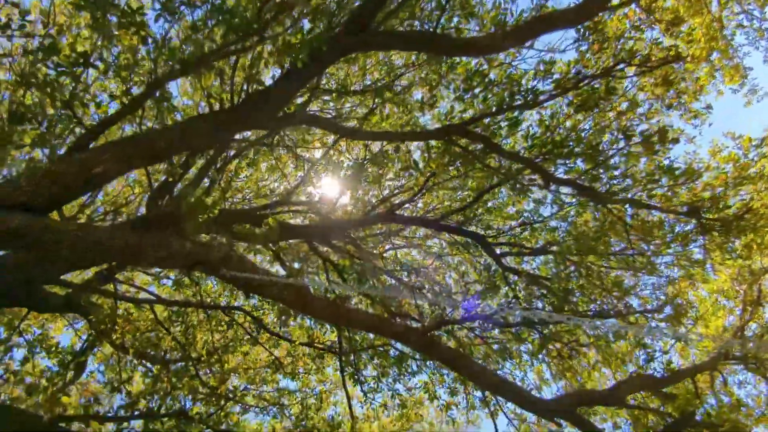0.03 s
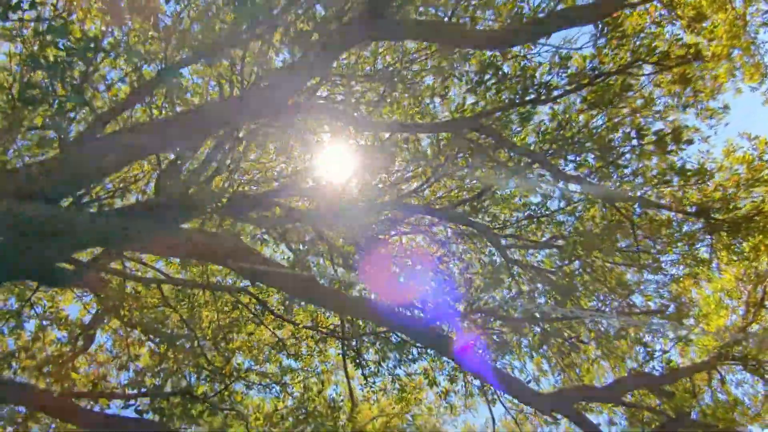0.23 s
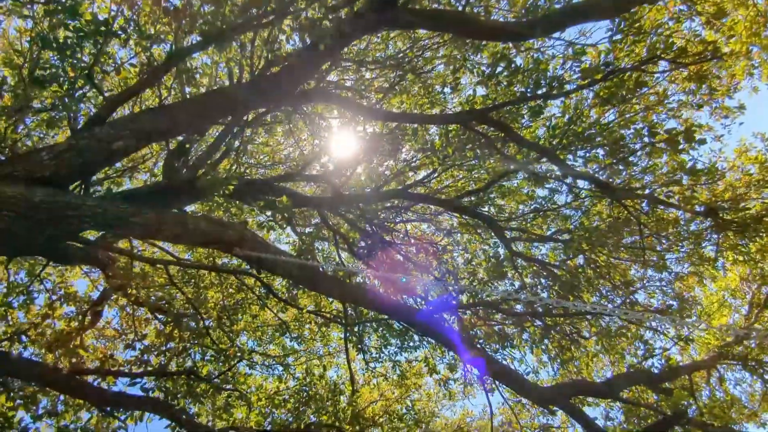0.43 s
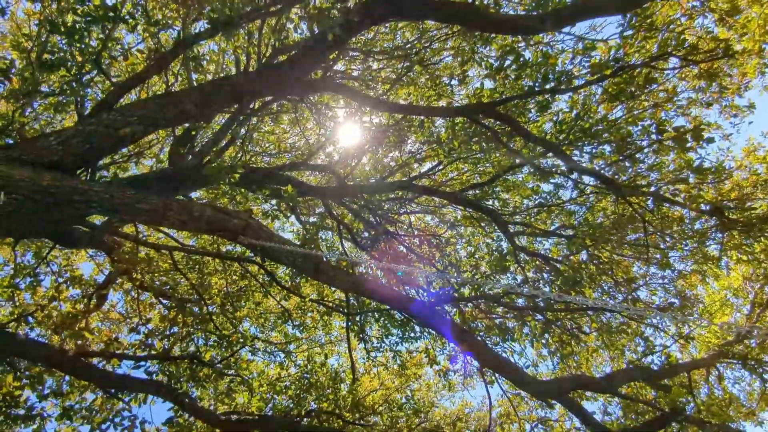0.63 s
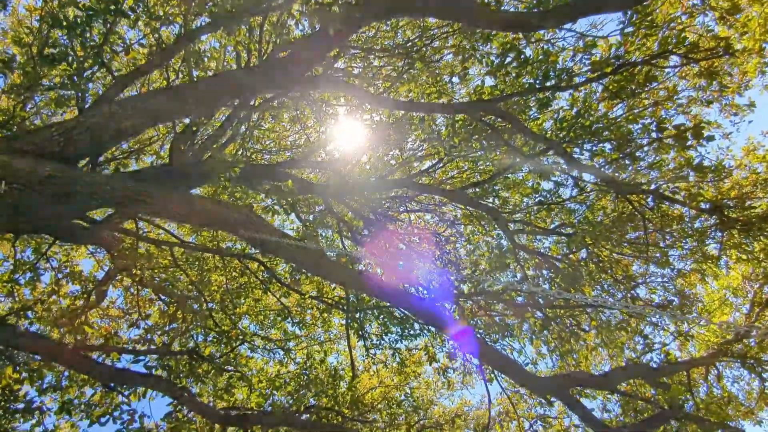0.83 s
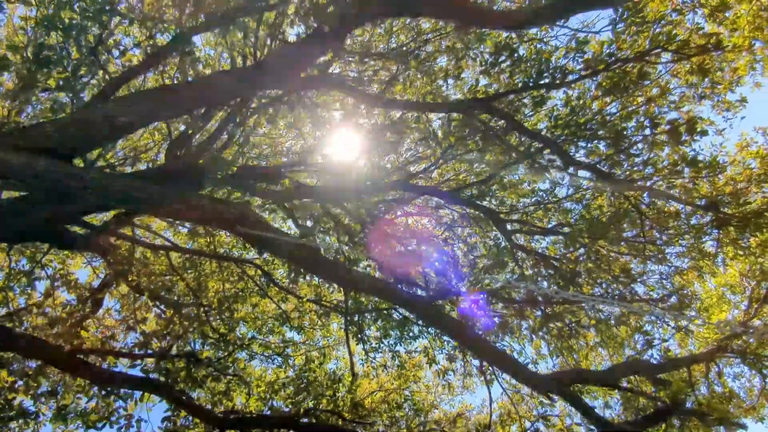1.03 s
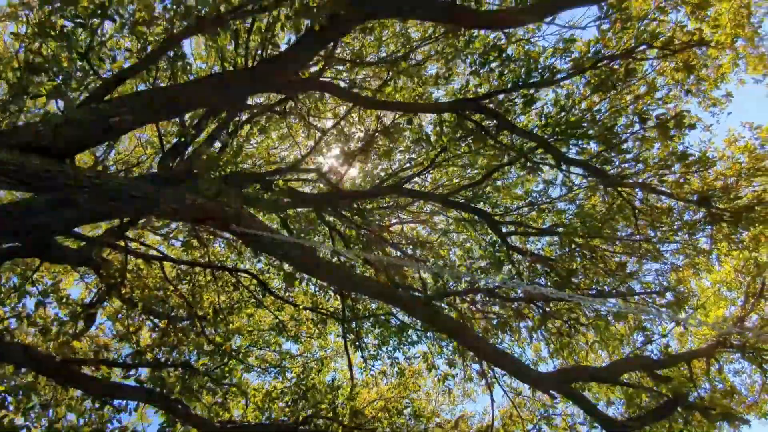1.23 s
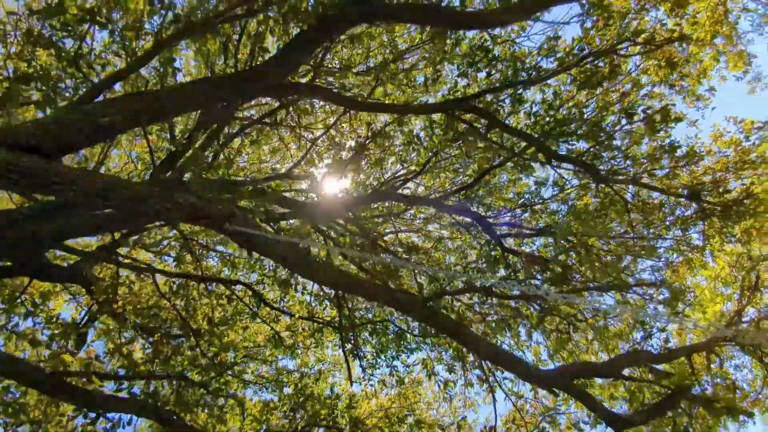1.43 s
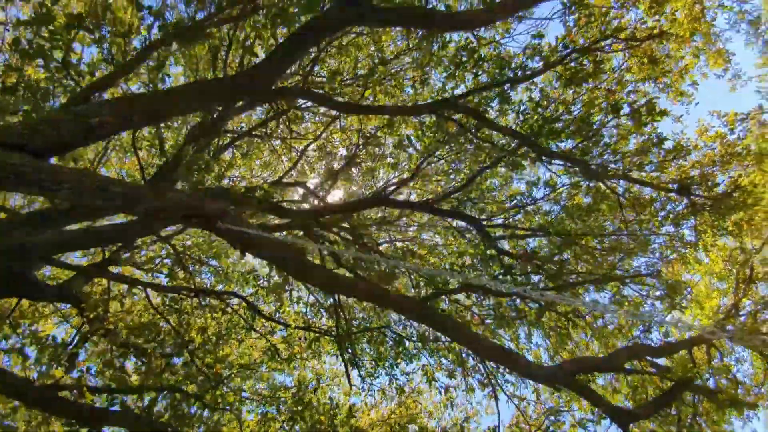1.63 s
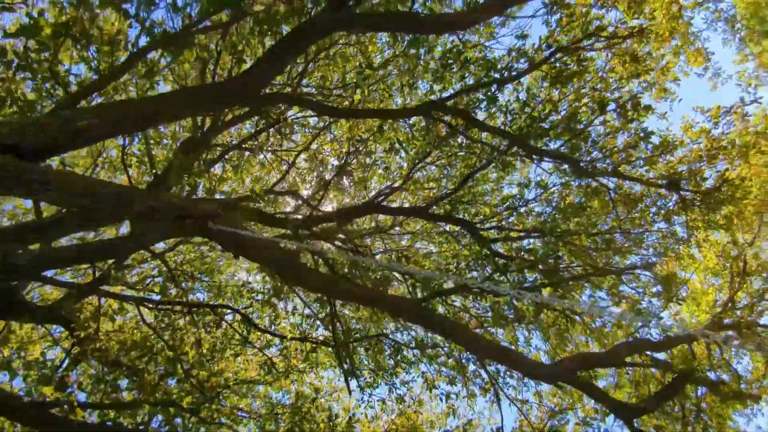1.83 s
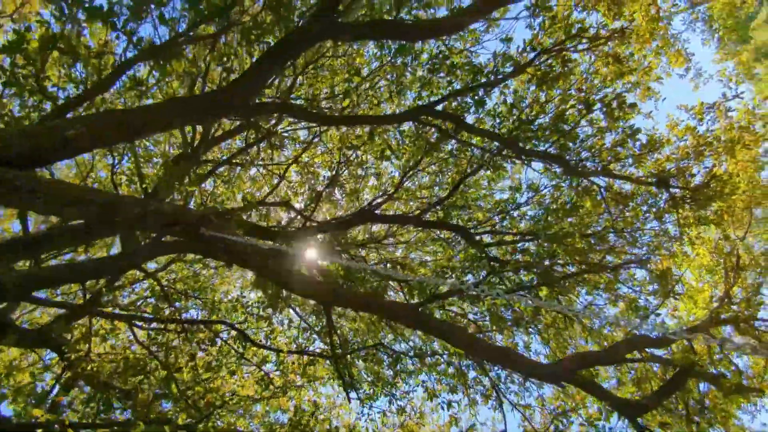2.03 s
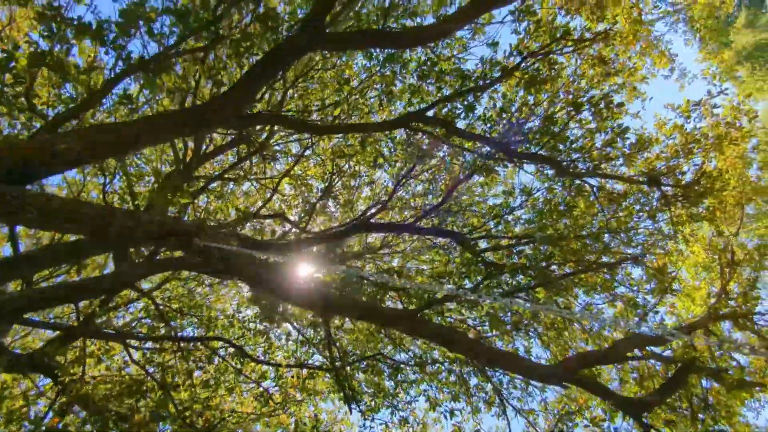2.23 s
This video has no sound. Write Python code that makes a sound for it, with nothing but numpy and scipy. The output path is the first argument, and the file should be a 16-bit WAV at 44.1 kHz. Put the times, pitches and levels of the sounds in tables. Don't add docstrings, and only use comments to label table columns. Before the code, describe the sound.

A rope creaks in fast jerks round a dry branch, growing louder and stopping within half a second; then a low gust bumps the stereo microphone, faint bird chips sound, and nearby cloth snaps near the end.

```python
import sys
import numpy as np
from scipy import signal
from scipy.fft import rfft, irfft
from scipy.io import wavfile
from scipy.ndimage import uniform_filter1d

SR = 44100
rng = np.random.default_rng(int(sys.argv[2]) if len(sys.argv) > 2 else 0)


def linear_from_db(decibels):
    return 10 ** (np.asarray(decibels, float) / 20)


def generate_wav(sig):
    pcm = np.round(np.clip(np.atleast_2d(sig).T, -1, 1) * 32767).astype(np.int16)
    wavfile.write(sys.argv[1], SR, pcm)


N = 101429

# [t/s, level/dB, left-right/dB, brightness/(dB per octave)]
GUST = [(0.0, -60, 2, 2.5), (0.61, -59.5, -0.5, -0.5), (0.88, -51, 5, 0), (0.97, -48, 2, 1.5),
        (1.05, -53.5, 20, -6.1), (1.26, -59, 5, -8), (1.3, -58, -33, -2), (1.34, -59.5, -5, -10),
        (1.37, -61, 4.5, -8.5), (1.53, -63, 22.5, -5), (1.6, -66.5, -7.5, -14), (1.78, -62.5, 7, 3.5),
        (1.81, -62.5, -5, 3), (1.94, -64.5, 11, 3.5), (1.98, -63, 2, 1.2), (2.22, -56, 1, 4.5),
        (2.3, -64, 2, 5)]
# [f/Hz, density/dB]
WIND_COLOUR = [(13, -49), (24, -25), (52, -0.5), (76, 1), (140, 0.5), (188, -8), (227, -14), (290, -19),
               (420, -35.5), (920, -120)]
# [f/Hz, density/dB]
LEAF_COLOUR = [(180, -32), (300, -4.5), (656, 0.5), (1060, 1), (1560, -8.5), (3290, -8), (4300, -23.5),
               (6620, -21), (16000, -26)]
# [t/s, level over the calm hiss/dB]
BREEZE = [(0, 0), (.3, 2), (.6, 2.5), (.9, 2.5), (1.15, 0), (1.4, 1.5), (1.7, 0), (2, 0.5), (2.3, 0.5)]
# [t/s, peak level/dB, rustle re tick/dB, rustle length/s, brightness/(dB per octave)]
TICKS = [(0.009, -68, -21, 0.012, -2), (0.147, -65, -14, 0.0087, -2.5), (0.1834, -64.5, -20, 0.031, -1.5),
         (0.368, -58.5, -17, 0.059, 1), (0.4746, -52.5, -19.5, 0.059, -0.5),
         (0.5282, -52.5, -4, 0.016, -4.5), (0.543, -60.5, -4.5, 0.034, -4),
         (0.7436, -65, -12.5, 0.027, -0.5), (0.786, -69, -10.5, 0.03, -5), (1.075, -62, -15, 0.065, 2.5),
         (1.112, -72, -6, 0.02, -3), (1.18, -67, -9, 0.013, -3), (1.1904, -63, -11, 0.026, -1.5),
         (1.258, -74, -12, 0.011, 3), (1.31, -74, -6, 0.034, -0.5), (1.38, -63.5, -14.5, 0.049, 0),
         (1.4163, -58, -7, 0.019, -3), (1.5795, -60.5, -22.5, 0.03, -1.5), (1.7133, -63.5, -21, 0.016, 1.5),
         (1.7306, -69, -16, 0.015, 1), (1.759, -75, -3.5, 0.017, -4.5), (1.9275, -76.5, -5, 0.035, -0.5),
         (2.0646, -62, -7.5, 0.024, -5.5), (2.0856, -48, -34, 0.005, 13),
         (2.0862, -47.5, -12.5, 0.015, 1.9), (2.0965, -58, -8, .008, 0), (2.103, -58, -4, 0.014, 4),
         (2.113, -52, -12, 0.0077, -2), (2.141, -67, -12, 0.0089, 1), (2.124, -70.5, -7.5, 0.04, -1)]
# [f/Hz, density/dB]
CLOTH_COLOUR = [(400, -7), (1700, -6), (3000, -4), (4300, -9), (6600, 0.5), (7600, -3), (10000, -3.5),
                (15500, -7.5)]
# [t/s, level/dB]
CHIPS = [
    (.152, -72),
    (.658, -71),
    (0.796, -72.5),
    (0.943, -68.5),
    (1.078, -83),
    (1.195, -73),
    (1.65, -78.5),
    (1.756, -76.5),
]
# [t/s, peak level/dB]
SLIPS = [(.2042, -50), (.2160, -40), (.2288, -35.5), (.2436, -36), (.2559, -32), (.2687, -32), (.2832, -34),
         (.2964, -41), (.3078, -31.5), (.3194, -31), (.3305, -31), (.3447, -28.5), (.3598, -28.5),
         (.3839, -27.5), (.3998, -29), (.4232, -26.5), (.4955, -26)]
# [f/Hz, level/dB, T60/s, left-right/dB]
WOOD_MODES = [(356, -11.5, 0.15, 0), (600, -12, 0.083, 3), (692, -2.5, 0.043, 8), (797.3, 5.5, 0.14, 2.5),
              (956, -17, 0.09, 12), (1150, -20, 0.046, -2), (1188, -2, 0.084, 3), (1190, -22, 0.09, -5),
              (1403, -4.5, 0.28, -10), (1577, -18, 0.33, -7), (1755, -1.5, 0.12, -17.5),
              (1940, -7.5, 0.15, -15.5), (2383, -4.5, 0.06, -15), (2623, -7, 0.043, 18.5)]
# [f/Hz, level/dB, T60/s, left-right/dB]
ROPE_MODES = [(2910, -24, 0.043, -6), (3240, -19, 0.028, 2), (3310, -13, 0.067, 4), (3500, -24, 0.033, 1),
              (3750, -13.5, 0.087, -9.5), (4260, -27, 0.035, 3), (4720, -18, 0.029, 17),
              (5010, -22.5, 0.037, -6), (5080, -26, .04, 12)]
# [delay/s, level/dB, left-right/dB]
ECHOES = [
    (.0001, -1.47, -4),
    (.0045, -16.5, -19),
    (.008, -17, -25),
    (0.0123, -37, 10),
]
# [f/Hz, density/dB]
SCATTER_COLOUR = [(300, -20.5), (560, -10), (780, 3.5), (1000, -11), (1400, 1), (2150, -22.5),
                  (3500, -26.5), (5200, -41), (16000, -54)]
# [t/s, level/dB, f/Hz, length/s, left-right/dB]
BUFFETS = [(.775, -47, 109, 0.029, -2), (0.95, -40, 81.5, 0.064, 9.5), (.958, -50, 169, 0.037, -11),
           (1.067, -43.5, 78, 0.032, 20.5), (1.299, -45, 212, 0.024, -19), (1.304, -60, 346, 0.015, -11),
           (1.316, -44.5, 92, 0.048, -2.5), (1.831, -61.5, 262, 0.016, 2), (1.929, -52.5, 88, 0.028, 10),
           (2.004, -58.5, 124, 0.032, 3), (2.054, -60.5, 270, 0.018, 0), (2.185, -48.5, 164, 0.025, 0),
           (2.22, -52, 184.5, 0.027, 3)]
HUM_TIMES = (1.18, 1.28, 1.458, 1.6)
# [t/s, f/Hz, level/dB, T60/s]
BUCKLES = [(1.4178, 3760, -59.5, 0.017), (1.4176, 2700, -63.5, 0.019), (1.418, 7200, -65, 0.011),
           (1.417, 4800, -66, 0.013), (2.055, 1500, -69, 0.072), (2.078, 1600, -63.5, 0.046),
           (2.097, 2400, -65.5, .02), (2.11, 3500, -74, .02), (2.0855, 1730, -60.5, 0.076),
           (2.091, 1500, -63.5, 0.03), (2.106, 1700, -65, 0.041), (2.0858, 8730, -42.5, 0.0044),
           (2.068, 11000, -68, 0.0062)]


def table(rows):
    return np.array(rows, float).T


def unit(x):
    return x / np.sqrt(np.mean(x ** 2))


def band(x, hz, width):
    edges = np.clip([hz - width / 2, hz + width / 2], 10, .45 * SR)
    return signal.sosfilt(signal.butter(2, edges, "band", fs=SR, output="sos"), x)


def colour(points, hz):
    f, db = table(points)
    return np.interp(np.log(hz), np.log(f), db)


def shape(x, points):
    n = x.shape[-1]
    hz = np.maximum(np.arange(n // 2 + 1) * SR / n, 1)
    gain = linear_from_db(colour(points, hz))
    return irfft(rfft(x) * gain / np.sqrt(np.mean(gain ** 2)), n)


def walk(rate):
    k = int(SR / rate)
    steps = np.repeat(rng.standard_normal(N // k + 1), k)
    return 1.094 * uniform_filter1d(uniform_filter1d(steps, k), k)[:N]


def add(out, sound, s):
    i = max(int(s * SR), 0)
    n = min(sound.shape[-1], out.shape[-1] - i)
    out[:, i:i + n] += sound[..., :n]


def pan(db):
    return linear_from_db(np.array([db, -db]) / 2).reshape(2, -1)


def chirp(hz, length):
    u = np.arange(int(length * SR)) / (length * SR)
    cycles = length * (hz[0] * u + (hz[1] - hz[0]) * u ** 2 / 2)
    return np.sin(np.pi * u) ** 2 * np.sin(2 * np.pi * cycles)


def ring(rows, t, vary_db, vary_hz):
    ring_db, port_turn_rad = -20, 0.19
    hz, db, t60, lr = table(rows)[:, :, None]
    turns = 2 * np.pi * (hz + vary_hz) * t
    ports = []
    for side in (1, -1):
        level = linear_from_db(ring_db + db + vary_db + side * lr / 2 - 60 * t / t60)
        modes = level * np.sin(turns + side * port_turn_rad * lr / 10)
        ports.append(modes.sum(axis=0))
    return np.array(ports)


def wind(gust_db, pan_db, bright_db):
    flicker_db, shared, pan_db_per_oct = 3.5, 1, -4
    out, lurch = 0, np.array([walk(13.84), walk(17.0)])
    for hz in 30 * 2 ** np.arange(0, 4.2, .5):
        noise = band(rng.standard_normal((3, N)), hz, hz / 2.48)
        own = np.array([walk(hz / 6), walk(hz / 6)])
        octave = np.log2(hz / 100)
        db = colour(WIND_COLOUR, hz) + flicker_db * own + 0.88 * lurch + bright_db * octave
        out = out + linear_from_db(db) * pan(pan_db_per_oct * octave) * (noise[:2] + shared * noise[2])
    return unit(out) * linear_from_db(gust_db + 1) * pan(pan_db)


def leaves(gust_db):
    level_db, lift_per_gust, lift_corner_hz = -74.5, 0.96, 2430
    out, swell_db = 0, np.interp(np.arange(N) / SR, *table(BREEZE))
    for hz in 330 * 2 ** np.arange(0, 5.7, .4):
        mid, side = band(rng.standard_normal((2, N)), hz, hz / 2.5)
        lift_db = lift_per_gust * (gust_db + 65) / (1 + (hz / lift_corner_hz) ** 2)
        db = colour(LEAF_COLOUR, hz) + lift_db + swell_db + 0.45 * walk(8.82)
        out = out + linear_from_db(db) * (mid + 0.91 * side * np.array([[1], [-1]]))
    calm = out[:, -N // 3:]
    return out * linear_from_db(level_db) / np.sqrt(np.mean(calm ** 2))


CLOTH_PAN_DB = 7


def cloth():
    tick_s, lag_s, grain_spread_db = .0006, .00015, 2.5
    out, u = np.zeros((2, N)), np.arange(SR // 4) / SR
    lead = SR // 200
    grain_db = grain_spread_db * walk(600)
    for s, db, rustle_db, length, bright_db in TICKS:
        grain = linear_from_db(np.roll(grain_db, -int(s * SR))[:len(u)])
        rustle = (1 - np.exp(-u / 0.0022)) * np.exp(-(u / length) ** 1.6) * grain
        envelope = np.exp(-u / tick_s) + linear_from_db(rustle_db) * rustle
        grains = rng.standard_normal((2, len(u))) * np.roll(envelope, lead)
        grains[1] = -.75 * np.roll(grains[0], int(lag_s * SR)) + .5 * grains[1]
        tone = [(hz, level_db + bright_db * np.log2(hz / 8000)) for hz, level_db in CLOTH_COLOUR]
        add(out, linear_from_db(db) * shape(grains, tone), s - lead / SR)
    return out * pan(CLOTH_PAN_DB)


def bird():
    chip_hz, chip_s, flutter_db = (2833, 2250), .024, 4
    out = np.zeros((2, N))
    for s, db in CHIPS:
        add(out, linear_from_db(db) * chirp(chip_hz, chip_s), s - chip_s / 2)
    return out * linear_from_db(flutter_db * walk(300) - 3)


def creak():
    chirp_hz, chirp_s, chirp_pan_db = (1820, 970), 0.00484, -1
    thud_hz, thud_s, thud_db, thud_delay_s = (817.5, 666), 0.00718, -8.5, 0.00018
    scatter_db, scatter_t60_s, scatter_fresh = -19.5, 0.23, 0.53
    wood_spread_db, rope_spread_db, rope_spread_hz = .8, 2.5, 35
    ring_rise_s, slip_lead_s = 0.0061, .0007
    out, t = np.zeros((2, N)), np.arange(SR // 4) / SR
    onset = np.clip(t / ring_rise_s, 0, 1) ** 2
    tail = linear_from_db(scatter_db - 60 * t / scatter_t60_s) * onset * pan(chirp_pan_db)
    body = np.zeros((2, len(t)))
    for delay, echo_db, echo_lr in ECHOES:
        add(body, linear_from_db(echo_db) * chirp(chirp_hz, chirp_s) * pan(chirp_pan_db + echo_lr), delay)
    add(body, linear_from_db(thud_db) * chirp(thud_hz, thud_s), thud_delay_s)
    wood_db = wood_spread_db * rng.standard_normal((len(SLIPS), len(WOOD_MODES), 1))
    rope = rng.standard_normal((len(SLIPS), 2, len(ROPE_MODES), 1))
    grain = rng.standard_normal((2, len(t)))
    for (s, peak_db), vary_db, (db, hz) in zip(SLIPS, wood_db, rope):
        fresh = rng.standard_normal((2, len(t)))
        hiss = unit(shape(grain + scatter_fresh * fresh, SCATTER_COLOUR))
        scatter = (hiss + 0.5 * hiss[::-1]) * tail
        modes = ring(WOOD_MODES, t, vary_db, 0)
        modes = modes + ring(ROPE_MODES, t, rope_spread_db * db, rope_spread_hz * hz)
        add(out, linear_from_db(peak_db) * (modes * onset + body + scatter), s - slip_lead_s)
    return out


def buffets():
    out = np.zeros((2, N))
    for s, db, hz, length, lr in BUFFETS:
        add(out, linear_from_db(db) * chirp((hz * 0.822, hz * 1.16), length) * pan(lr), s - length / 2)
    return out


def hum():
    t = np.arange(N) / SR
    swell = np.interp(t, HUM_TIMES, [0, 1, 1, 0])
    return linear_from_db(-78) * swell * linear_from_db(2 * walk(15)) * np.sin(2 * np.pi * 462 * t)


def buckling():
    out, u = np.zeros((2, N)), np.arange(SR // 4) / SR
    for s, hz, db, t60 in BUCKLES:
        add(out, linear_from_db(db - 60 * u / t60) * np.sin(2 * np.pi * hz * u), s)
    return out * pan(CLOTH_PAN_DB)


def scene():
    s, *controls = table(GUST)
    gust_db, pan_db, bright_db = [np.interp(np.arange(N) / SR, s, c) for c in controls]
    air = wind(gust_db, pan_db, bright_db) + leaves(gust_db) + buffets()
    return air + cloth() + bird() + creak() + hum() + buckling()


def top_cut(x):
    return signal.sosfilt(signal.butter(12, 16470, fs=SR, output="sos"), x)


def record(dry):
    x = signal.sosfilt(signal.butter(2, 41.3, "high", fs=SR, output="sos"), dry)
    x = signal.sosfilt(signal.ellip(6, .3, 50, 16000, fs=SR, output="sos"), x)
    return top_cut(x)


dry = scene()
out = record(dry)
generate_wav(out)
```